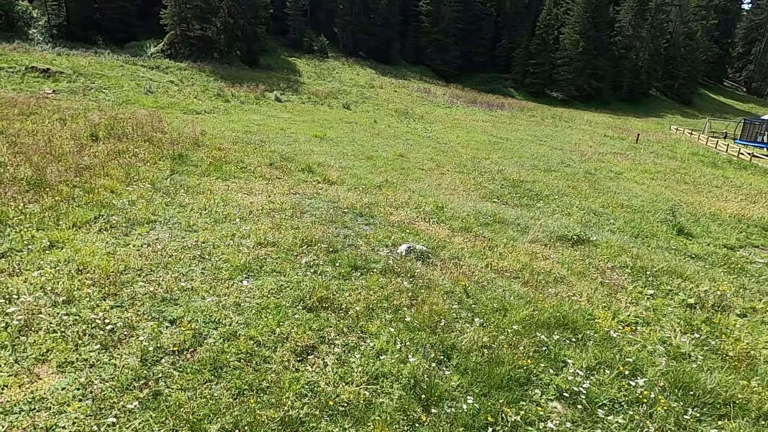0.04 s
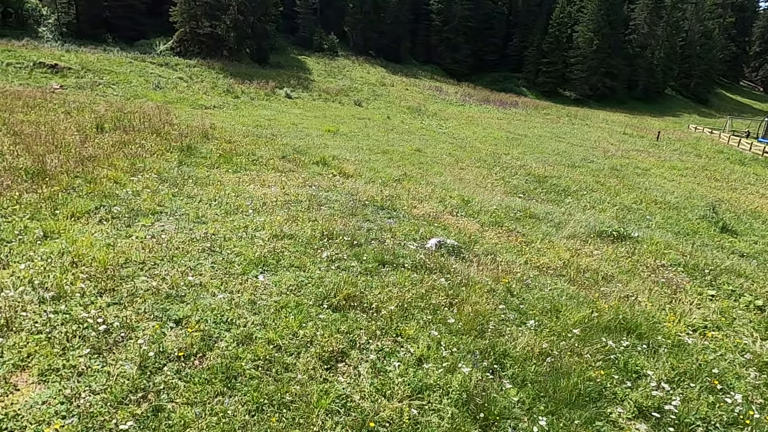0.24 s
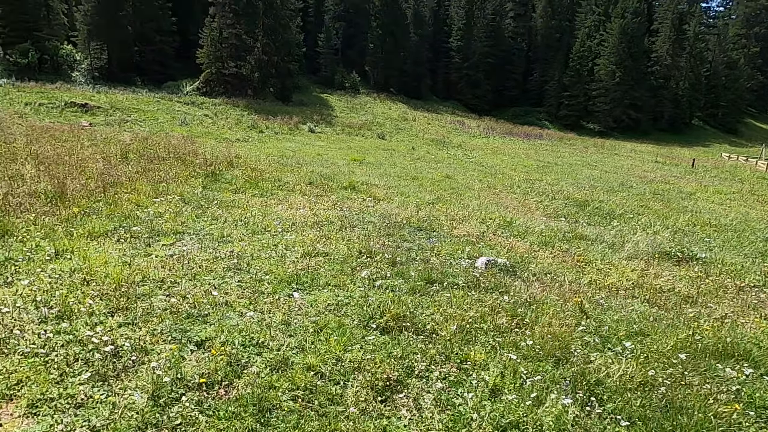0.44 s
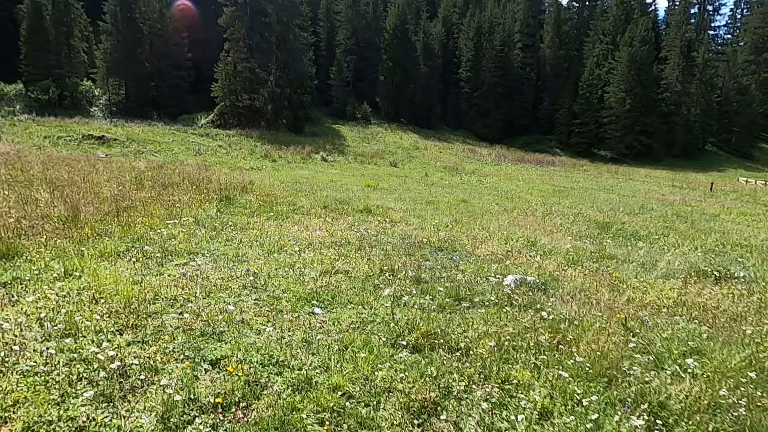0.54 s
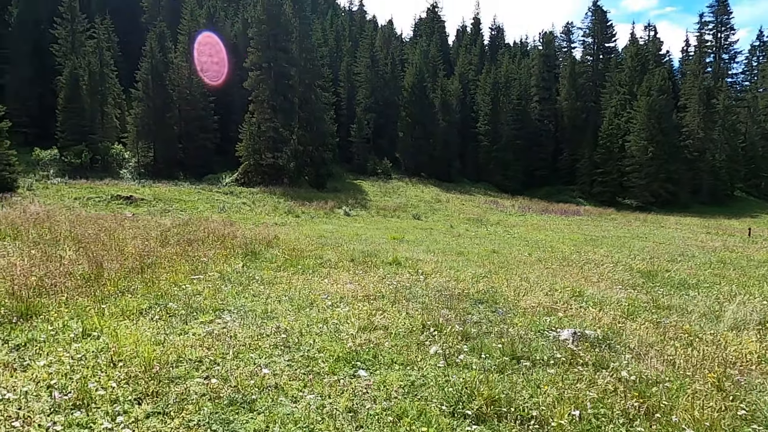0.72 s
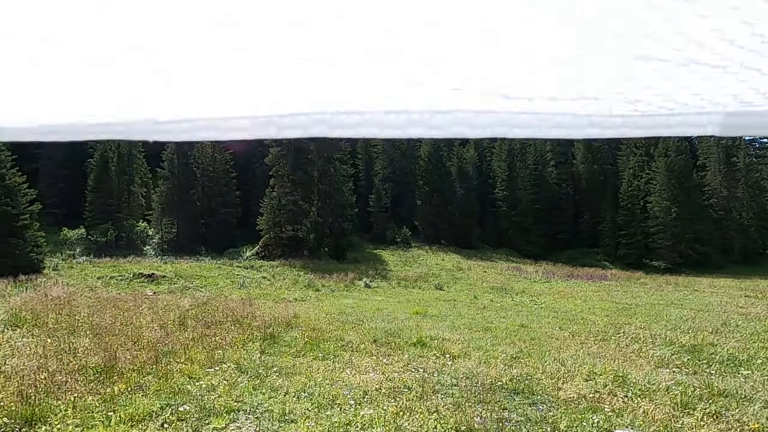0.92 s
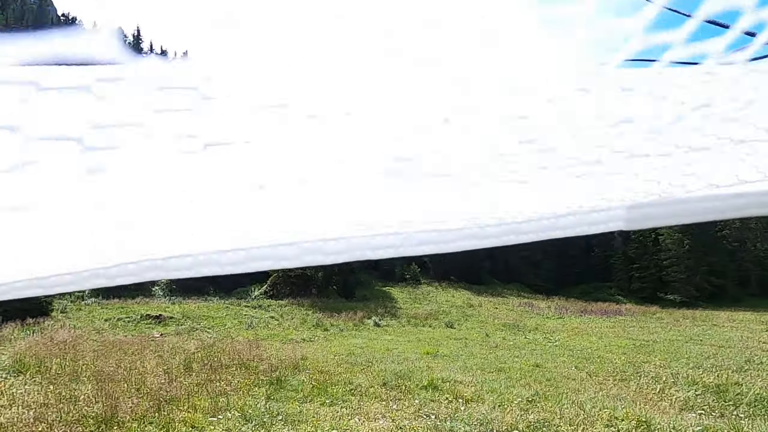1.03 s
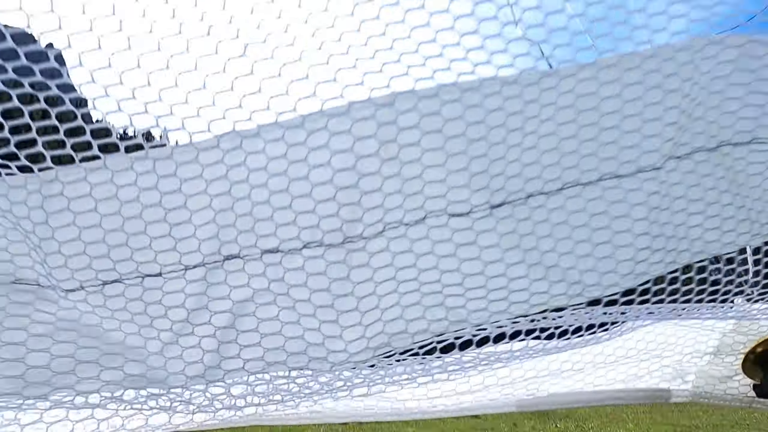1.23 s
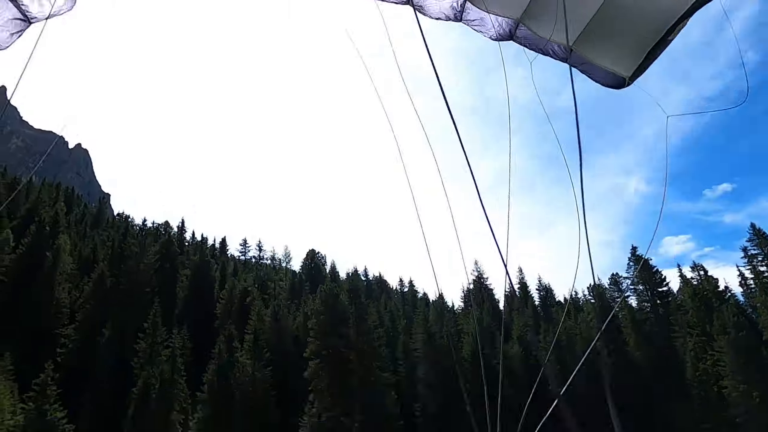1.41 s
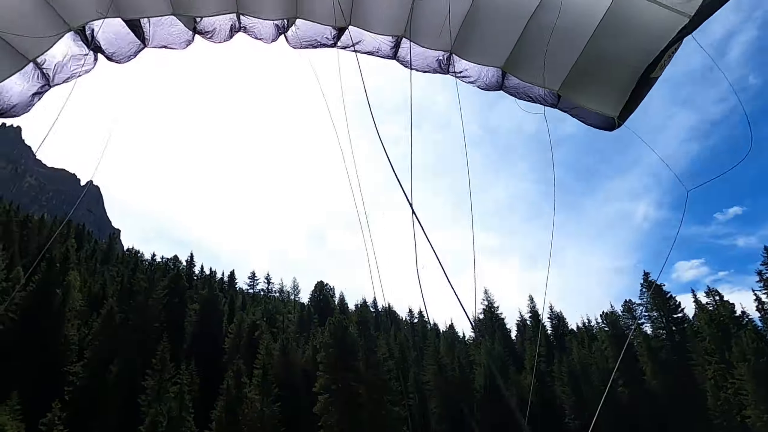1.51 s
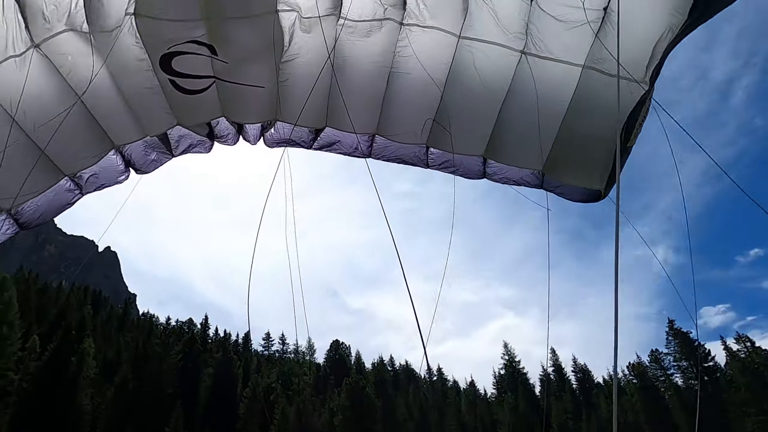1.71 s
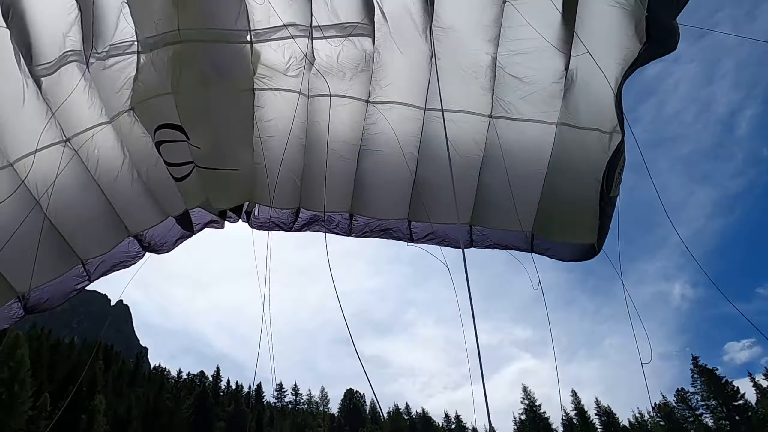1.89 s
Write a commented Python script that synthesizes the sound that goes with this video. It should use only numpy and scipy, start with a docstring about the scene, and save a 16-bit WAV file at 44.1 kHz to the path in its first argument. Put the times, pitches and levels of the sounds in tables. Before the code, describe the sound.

Parachute fabric swishes past, snaps open and flutters as wind buffets the microphone.

```python
"""A parachute opens over a meadow, heard from a camera worn by the flyer.
Air rushes and buffets the microphone from the start; cloth rustles and lines hum faintly.
Around 0.7 s the canopy sweeps past with a swish. Folds snap and lines zip as they pull tight.
From 1.4 s the cells fill: the canopy cracks taut, throbs and flutters, then leaves the wind
and one last humming line."""
import sys
import numpy as np
from scipy import signal
from scipy.fft import rfft, irfft
from scipy.io import wavfile
from scipy.ndimage import uniform_filter1d

SR = 44100
rng = np.random.default_rng(int(sys.argv[2]) if len(sys.argv) > 2 else 0)


def generate_wav(sig):
    """Save sig (samples, or channels by samples) to the path in sys.argv[1] as 16-bit PCM at SR."""
    pcm = np.round(np.clip(np.atleast_2d(sig).T, -1, 1) * 32767).astype(np.int16)
    wavfile.write(sys.argv[1], SR, pcm)


N = 85995

# tone of cloth on cloth, for rubs and snaps (frequency [Hz], relative level [dB])
CLOTH_SPECTRUM = [(100, -12), (300, 6), (1000, 4), (2500, -1), (5000, -11.5), (6500, -18), (8500, -22.5),
                  (11000, -36), (15000, -53)]


def amp(db):
    """Decibels to gain."""
    return 10 ** (np.asarray(db) / 20)


def unit(x):
    """Scales to rms 1."""
    return x / np.sqrt(np.mean(x ** 2) + 1e-20)


def burst(x):
    """Scales a transient so that its energy, spread over 5 ms, has rms 1."""
    return x / np.sqrt(np.sum(x ** 2) / (.005 * SR))


def clock():
    """Time of every sample, in seconds."""
    return np.arange(N) / SR


def fader(points):
    """Gain along a curve of (time [s], level [dB])."""
    return amp(np.interp(clock(), *np.transpose(points)))


def swell(middle_s, half_s):
    """Bell-shaped fade in and out."""
    return np.exp(-((clock() - middle_s) / half_s) ** 2)


def add(mix, start_s, sound):
    """Drops a sound into the mix."""
    part = mix[round(start_s * SR):][:len(sound)]
    part += sound[:len(part)]


def colour(x, spectrum, tilt_db=0):
    """Equalises x to a spectrum, tilted per octave above 256 Hz, at rms 1."""
    octave = np.log2(np.fft.rfftfreq(N, 1 / SR) + 1)
    hz, db = np.transpose(spectrum)
    curve_db = np.interp(octave, np.log2(hz + 1), db) + tilt_db * np.maximum(octave, np.log2(256))
    low_cut_db = 18 * np.maximum(np.log2(hz[0] + 1) - octave, 0)
    return unit(irfft(rfft(x) * amp(curve_db - low_cut_db), N))


def drift(rate_hz):
    """Random wander of rms 1, mostly slower than rate_hz."""
    hz = np.fft.rfftfreq(N, 1 / SR)
    return unit(irfft(rfft(rng.standard_normal(N)) / (1 + (hz / rate_hz) ** 4), N))


def crinkle(grainy):
    """Hiss mixed with tiny, uneven slips of cloth; grainy is their share of the power."""
    slips_per_s, spread_db = 2500, 3
    size = amp(spread_db * np.minimum(rng.exponential(1, N), 4))
    slips = size * rng.choice([-1, 1], N) * (rng.random(N) < slips_per_s / SR)
    return np.sqrt(grainy) * unit(slips) + np.sqrt(1 - grainy) * rng.standard_normal(N)


def wind():
    """The bed: an uneven rush of air, and lumpy buffeting at the microphone."""
    # tone of the rush and of the buffeting (frequency [Hz], relative level [dB])
    rush_spectrum = [(80, -12), (130, -3), (220, -4.5), (500, -9.5), (1000, -14.5), (1940, -20),
                     (3100, -27.5), (3750, -27.5), (6500, -39), (8500, -42), (10200, -48.5), (12000, -61),
                     (15500, -92)]
    buffet_spectrum = [(8, -3), (24, 0.5), (60, -3.5), (100, -9), (190, -17.5), (400, -37), (1500, -71),
                       (15000, -115)]
    # their gusts (time [s], level [dB])
    rush_level = [(0, -42.5), (.2, -39.5), (.45, -38.5), (.55, -36), (1.08, -39.5), (1.18, -37),
                  (1.29, -38.5), (1.35, -35.5), (1.8, -40.5), (1.95, -38)]
    buffet_level = [(0, -32), (.22, -33.5), (.31, -26.5), (.4, -34), (.48, -32.5), (.57, -36.5),
                    (.66, -30.5), (.7, -18.5), (.742, -17), (.775, -22), (.805, -22.5), (.85, -39),
                    (.9, -46.5), (1.09, -44.5), (1.24, -26.5), (1.29, -46), (1.378, -48), (1.39, -26),
                    (1.6, -22), (1.7, -25), (1.8, -41.5), (1.95, -33.5)]
    rush = colour(crinkle(grainy=0.15), rush_spectrum) * fader(rush_level)
    rush *= amp(1.12 * drift(rate_hz=29))
    rumble = colour(rng.standard_normal(N), buffet_spectrum)
    rumble /= np.sqrt(uniform_filter1d(rumble ** 2, size=3000) + 1e-9)  # levelled ahead of the fader
    return rush + rumble * fader(buffet_level)


def line_hums():
    """Air sheds eddies from a taut line: a faint, wavering low note."""
    # humming lines (middle [s], half length [s], level [dB], pitch [Hz], glide [Hz/s])
    notes = [(.19, .08, -42.5, 170, 1), (0.499, 0.058, -36, 179.2, 30.5), (1.85, 0.067, -39, 238, -60)]
    out, t = np.zeros(N), clock()
    for middle, half, db, hz, glide in notes:
        pitch = hz * (1 + 0.015 * drift(rate_hz=25)) + glide * (t - middle)
        tone = np.sqrt(2) * np.sin(2 * np.pi * np.cumsum(pitch) / SR)
        out += tone * amp(db + 0.68 * drift(rate_hz=34)) * swell(middle, half)
    return out


def line_zips():
    """A line pulling tight runs over cloth: a brief burst of noise in one narrow resonance."""
    # running lines (middle [s], half length [s], level [dB], pitch [Hz], bandwidth [Hz])
    zips = [(0.7, 0.0033, -37, 4300, 1400), (0.244, 0.0026, -36.5, 5640, 2000),
            (1.018, 0.013, -40, 2093, 300), (1.302, .02, -49.5, 4450, 600),
            (1.412, 0.0013, -32.5, 5400, 800), (1.417, 0.0058, -40.5, 4550, 600),
            (1.44, 0.0022, -42, 5150, 700), (1.451, 0.0025, -33, 5120, 800),
            (1.456, .006, -35.5, 3900, 1000), (1.457, 0.014, -45.5, 8060, 1100)]
    out, t = np.zeros(N), clock()
    for middle, half, db, hz, width in zips:
        fuzz = drift(width / 2) + 1j * drift(width / 2)
        band = (fuzz * np.exp(2j * np.pi * hz * t)).real
        out += band * amp(db) * swell(middle, half)
    return out


def cloth_rubs():
    """Short, grainy strokes of cloth over cloth."""
    # strokes (middle [s], half length [s], level [dB], tilt [dB/octave])
    strokes = [(0.131, .018, -39.5, 0), (0.222, .005, -47, 2), (0.236, 0.0053, -29.5, -2),
               (0.2423, 0.0032, -37, 4), (0.378, 0.0036, -46, 3), (0.532, 0.0072, -28, -4.5),
               (0.602, .004, -45, 10), (0.618, .004, -35.5, 6), (0.699, 0.0078, -27.5, 2),
               (0.725, 0.011, -26, -3), (1.02, 0.0069, -35.5, -0.5), (1.23, 0.02, -31.5, -3.5),
               (1.234, 0.034, -57, 12), (1.31, .007, -46.5, 7), (1.34, 0.035, -51.5, 12),
               (1.392, 0.016, -35.5, 5.5), (1.403, .012, -50, 29), (1.405, 0.0065, -24.5, 2),
               (1.448, 0.0086, -36, 3), (1.4594, 0.0035, -26.5, 5.5), (1.523, .003, -15, -10),
               (1.657, .012, -57.5, 17), (1.658, 0.0049, -34, -1)]
    return sum(colour(crinkle(grainy=0.68), CLOTH_SPECTRUM, tilt) * amp(db) * swell(middle, half)
               for middle, half, db, tilt in strokes)


def fold_snaps():
    """Each fold jerks taut with a sharp tick and a short spray of creases around its own pitch."""
    # snapping folds (time [s], level over 5 ms [dB], centre [Hz], decay [s])
    snaps = [(.1134, -39, 1100, .001), (0.126, -43.5, 3900, 0.00063), (0.2391, -34, 3520, 0.00035),
             (0.24, -29.5, 650, .0006), (0.243, -29, 1400, 0.0014), (0.2897, -34, 2400, 0.0003),
             (.52, -33.5, 1530, 0.0013), (0.7202, -28, 1800, 0.002), (.745, -26.5, 900, 0.0023),
             (0.9883, -32, 696, 0.00065), (1.2367, -28.5, 1590, 0.00072), (1.2434, -33, 1600, 0.00064),
             (1.3849, -29.5, 4500, 0.0007), (1.3854, -22.5, 1000, 0.00084), (1.3923, -27.5, 3600, 0.00092),
             (1.399, -42, 2000, .001), (1.409, -32, 1800, 0.0011), (1.4655, -22.5, 2400, 0.0019),
             (1.4942, -28, 2400, 0.002), (1.5204, -29.5, 2140, 0.0027)]
    width_octaves, skirt_db = 0.73, -10
    out, t = np.zeros(N), clock()[:2048]
    hz = np.fft.rfftfreq(len(t), 1 / SR) + 1
    cloth_hz, cloth_db = np.transpose(CLOTH_SPECTRUM)
    cloth = amp(np.interp(np.log(hz), np.log(cloth_hz), cloth_db))
    for start, db, centre, decay in snaps:
        spray = rng.standard_normal(len(t)) * np.exp(-t / decay)
        spray[0] += 4  # the tick
        gain = cloth * (amp(skirt_db) + np.exp(-(np.log2(hz / centre) / width_octaves) ** 2))
        # a minimum-phase filter keeps the attack sharp
        log_gain = np.log(np.r_[gain, gain[-2:0:-1]])
        response = np.exp(np.conj(signal.hilbert(log_gain)))[:len(hz)]
        add(out, start, amp(db) * burst(irfft(rfft(spray) * response)))
    return out


def air_puffs():
    """One swing of pressure for each big flap; the stretched panel drums briefly after it."""
    # air pushed by the cloth (time [s], peak [dB], width [s])
    puffs = [(.243, -23, .0008), (.69, -20.5, 0.0032), (0.743, -14.5, 0.0036), (.535, -20, 0.00046),
             (1.219, -23, 0.0016), (1.228, -25.5, 0.0014), (1.247, -18, 0.0011), (1.3915, -15, 0.0018),
             (1.412, -17.5, 0.0016), (1.5205, -15.5, 0.0012), (1.593, -17.5, 0.0018),
             (1.671, -20.5, 0.0019)]
    panel_hz, panel_decay_s, panel_db = 243, .013, -9
    out, t = np.zeros(N), clock()
    drum = np.sin(2 * np.pi * panel_hz * t) * np.exp(-t / panel_decay_s)
    for time, db, width in puffs:
        offset = (t - time) / width
        out += amp(db) * offset * np.exp((1 - offset ** 2) / 2)
        add(out, time, amp(db + panel_db) * drum)
    return out


def canopy_swish():
    """The canopy slides past, its tone crossfading from coming to going."""
    # tone as it comes and as it goes (frequency [Hz], relative level [dB])
    coming_spectrum = [(88, -19), (150, -2.5), (200, -3.5), (270, -11), (600, -10), (4060, -25.5),
                       (10700, -46.5), (15500, -70)]
    going_spectrum = [(88, -17), (150, -4), (220, -5.5), (430, -2), (643, -7), (900, -9), (3690, -24.5),
                      (10100, -43.5), (15500, -66)]
    # rise and fall of the pass (time [s], level [dB])
    pass_level = [(.48, -64), (.55, -38.5), (.61, -29), (.67, -27.5), (.725, -21.5), (.77, -26.5),
                  (.83, -25.5), (.9, -33.5), (1.0, -36), (1.12, -43), (1.2, -59)]
    pass_s, crossfade_s = 0.72, 0.029
    away = .5 + .5 * np.tanh((clock() - pass_s) / crossfade_s)
    coming = np.sqrt(1 - away) * colour(crinkle(grainy=.5), coming_spectrum)
    going = np.sqrt(away) * colour(crinkle(grainy=0.32), going_spectrum)
    return (coming + going) * fader(pass_level) * amp(0.94 * drift(rate_hz=48))


def canopy_flutter():
    """The edge flaps unevenly, throbbing and chopping the noise of the filling cells."""
    # tone of the filling canopy (frequency [Hz], relative level [dB])
    fill_spectrum = [(76, -8), (130, -2.5), (228, -6.5), (391, -11.5), (942, -13.5), (1620, -26),
                     (2230, -28.5), (8680, -48), (11300, -56), (15500, -85)]
    # its surges (time [s], level [dB])
    fill_level = [(1.38, -55), (1.388, -21), (1.43, -28.5), (1.49, -32), (1.535, -24), (1.62, -29),
                  (1.68, -29.5), (1.73, -34), (1.78, -43.5)]
    flap_hz, wander, chop_depth, throb_db = 92.03, 0.15, 0.21, -19
    flap_rate = flap_hz * (1 + wander * drift(rate_hz=40.3))
    flap = np.sin(2 * np.pi * np.cumsum(flap_rate) / SR)
    cloth = colour(crinkle(grainy=0.22), fill_spectrum) * (1 + chop_depth * flap) * fader(fill_level)
    throb = unit(flap) * amp(throb_db) * swell(middle_s=1.535, half_s=0.04)
    return cloth + throb


def canopy_crack():
    """The canopy cracks taut: a whip-like jerk and its dying rustle ring a few short resonances."""
    # ring of the taut canopy (frequency [Hz], bandwidth [Hz], relative level [dB])
    modes = [(1180, 110, -3.5), (1690, 130, -6), (2200, 180, -1), (2580, 190, -1), (3190, 310, -2),
             (3800, 240, 0.5), (4280, 320, -3), (4900, 260, -4), (8550, 570, -10)]
    start_s, level_db, rustle_decay_s, muffle_hz = 1.4598, -16, 0.0045, 8000
    out, t = np.zeros(N), clock()[:2500]
    strike = 0.14 * rng.standard_normal(len(t)) * np.exp(-t / rustle_decay_s)
    strike[0] += 1  # the jerk
    ring = sum((-1) ** k * amp(db) * np.sin(2 * np.pi * hz * t) * np.exp(-np.pi * width * t)
               for k, (hz, width, db) in enumerate(modes))
    crack = signal.fftconvolve(strike, ring)[:len(t)]
    muffled = signal.lfilter(*signal.butter(2, muffle_hz, fs=SR), crack)
    add(out, start_s, amp(level_db) * burst(muffled))
    return out


def scene():
    """Wind, lines and cloth at one microphone in open air."""
    sustained = wind() + line_hums() + canopy_swish() + canopy_flutter()
    transients = cloth_rubs() + fold_snaps() + line_zips() + air_puffs() + canopy_crack()
    return (sustained + transients)[None]


def record(dry):
    """The microphone dulls the highest treble, and a steep low-pass cuts off the top."""
    dull_from_hz, cutoff_hz, loss_db = 12500, 15700, -3
    hz = np.fft.rfftfreq(N, 1 / SR)
    rolloff = amp(np.interp(hz, [dull_from_hz, cutoff_hz], [0, loss_db]))
    dull = irfft(rfft(dry) * rolloff, N)
    low_pass = signal.firwin(511, cutoff_hz, window=("kaiser", 9), fs=SR)
    return signal.oaconvolve(dull, low_pass[None], "same")


dry = scene()
out = record(dry)
generate_wav(out)
```